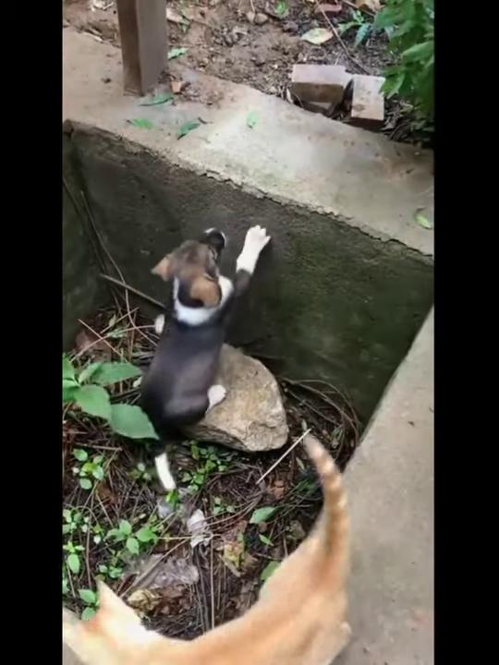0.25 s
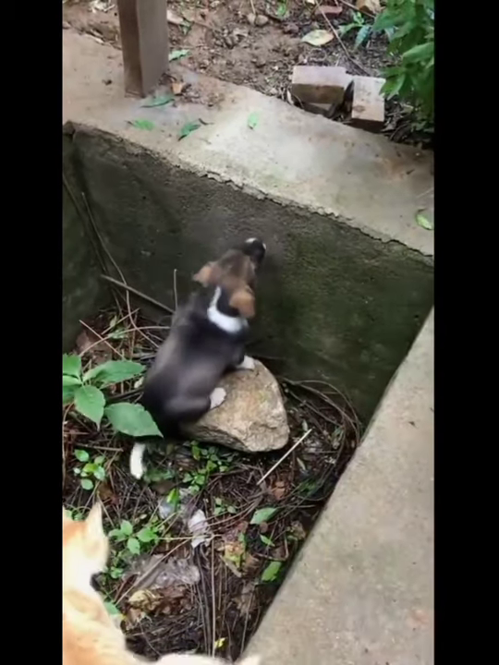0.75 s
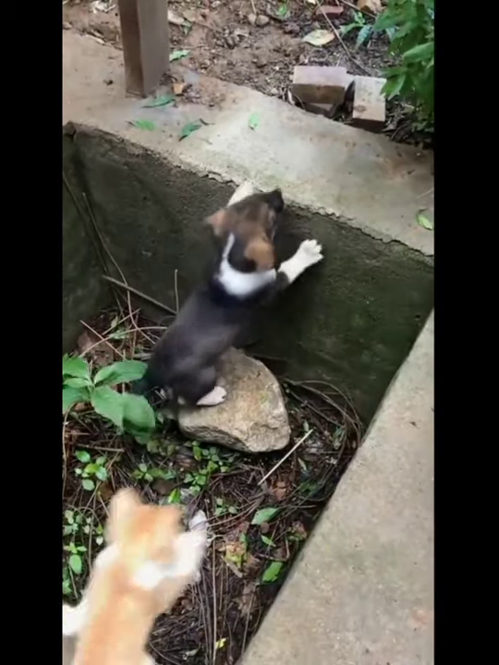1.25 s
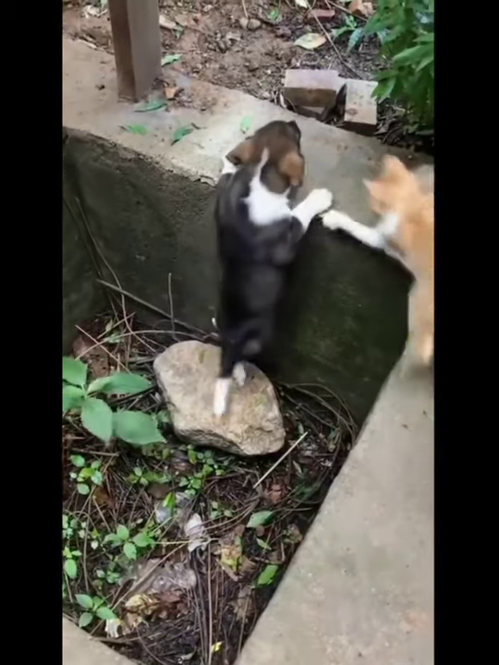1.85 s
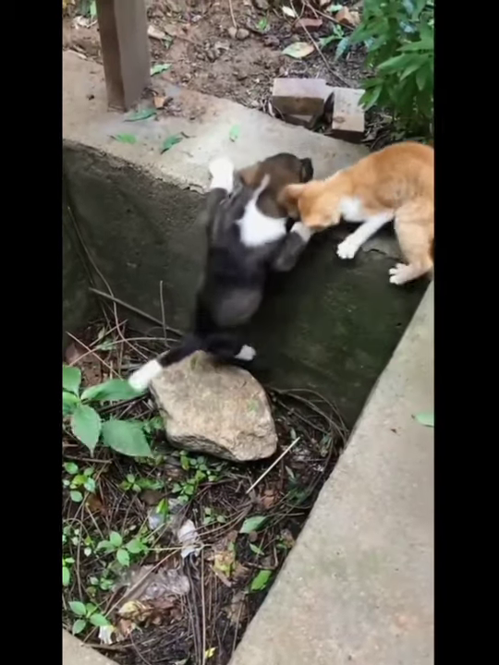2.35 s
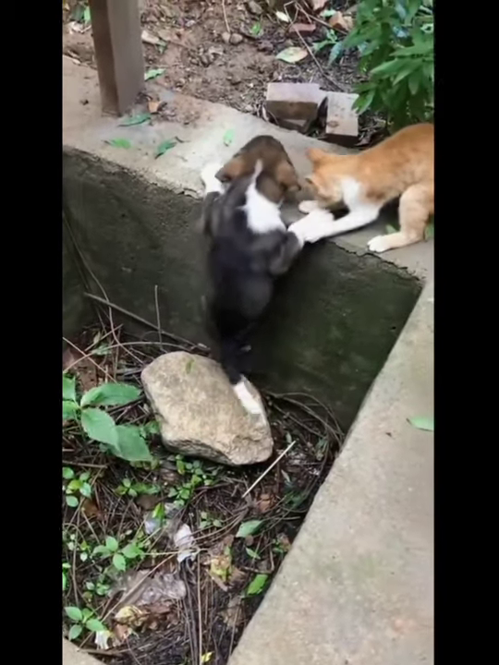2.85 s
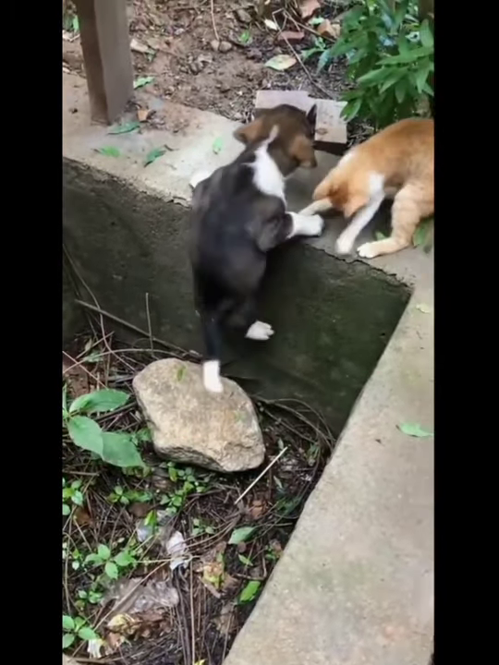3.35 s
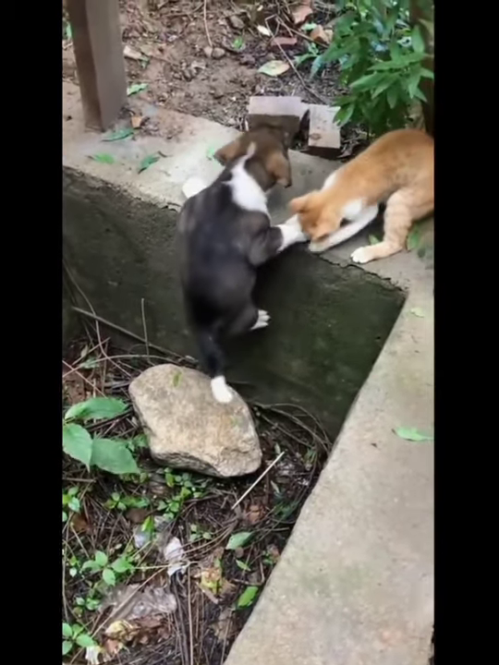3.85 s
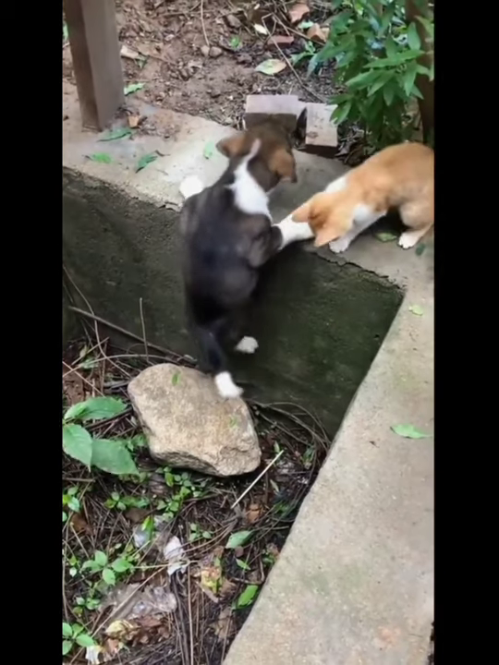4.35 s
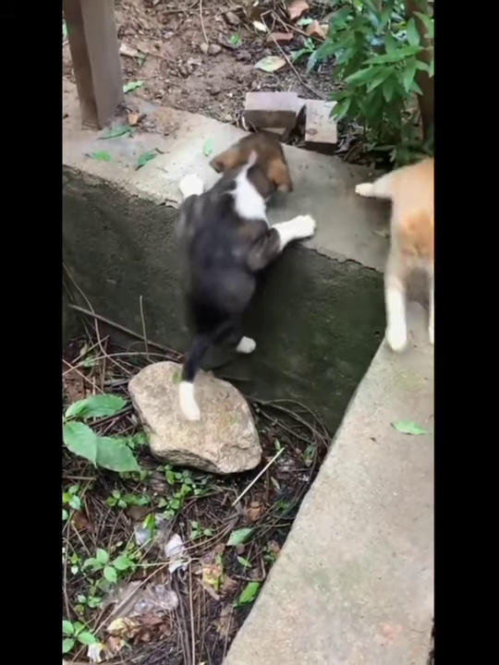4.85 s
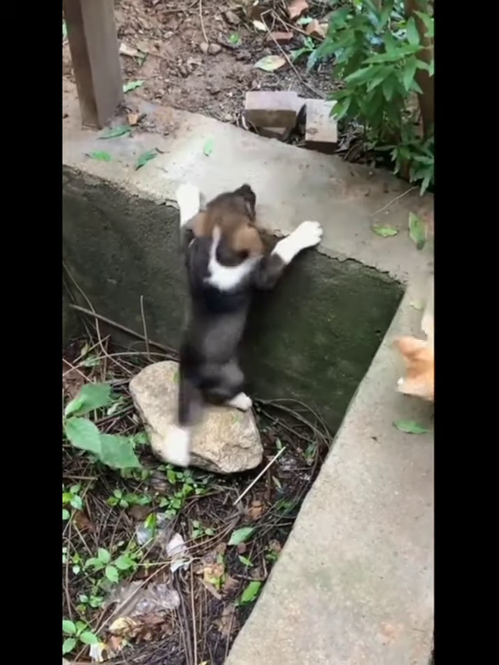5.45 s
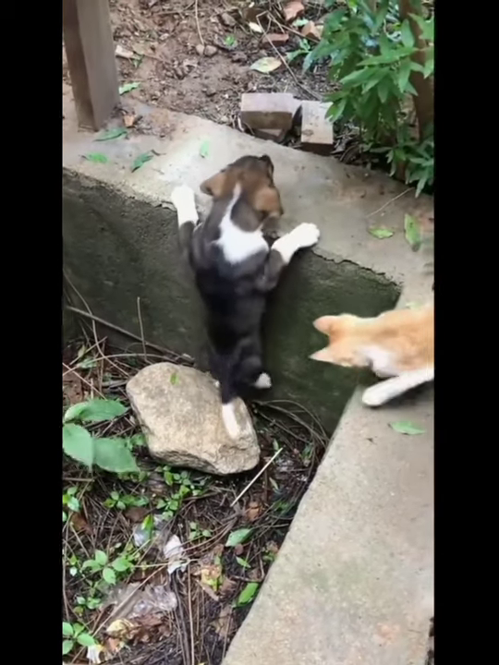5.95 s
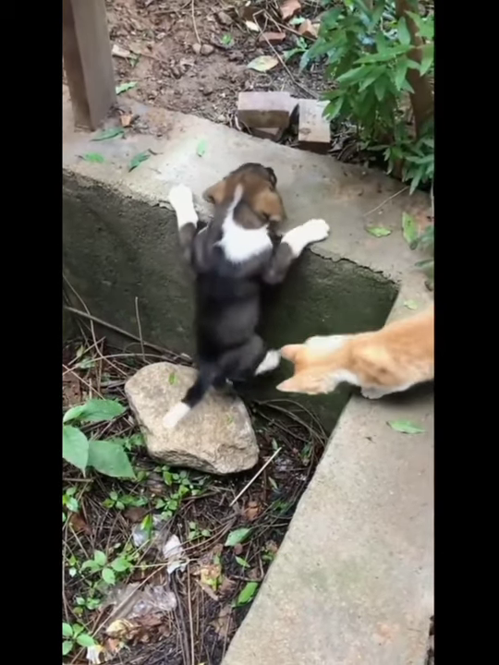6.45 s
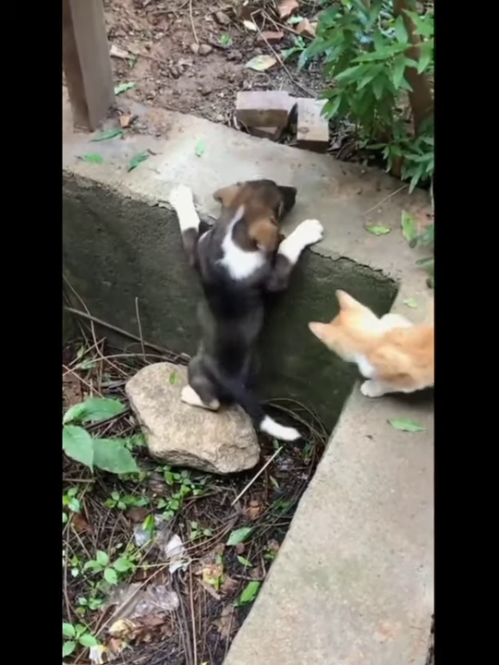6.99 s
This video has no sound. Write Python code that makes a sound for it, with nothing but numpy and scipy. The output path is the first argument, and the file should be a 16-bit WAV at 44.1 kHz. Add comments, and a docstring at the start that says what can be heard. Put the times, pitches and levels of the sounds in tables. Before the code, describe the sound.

A struggling puppy whimpers in quick gliding whistles, puffing and squeaking as its claws scratch rough concrete. A middle stretch holds mostly dry scrabbling bursts and soft fur rustle. After some harder scrapes, a wavering high whine rises, then small grunts and a closed-mouth moan, and finally a loud cracked yelp leaping into a piercing whine. Quiet outdoor air and low rumble sit behind, with only slight reflections from the walls.

```python
"""Puppy whining in a concrete pit

A puppy hangs on the concrete edge of a pit outdoors and whines in short, high, gliding cries.
Each cry is a nearly pure tone with thin overtones and hiss; the loudest starts with a lower, hoarse yelp.
Squeaks and grunts are narrow bands of noise, faint moans are wavering harmonics shaped by a closed mouth.
Claws scrape and catch as bursts of gritty noise; fur rustles; faint outdoor hiss and rumble lie behind."""
import sys
import numpy as np
from scipy import signal
from scipy.fft import rfft, irfft, next_fast_len
from scipy.io import wavfile

SR = 44100
rng = np.random.default_rng(int(sys.argv[2]) if len(sys.argv) > 2 else 0)


def store_pcm(level_fs):
    """Save levels as 16-bit WAV."""
    pcm = np.round(np.clip(level_fs, -1, 1) * 32767).astype(np.int16)
    wavfile.write(sys.argv[1], SR, np.atleast_2d(pcm).T)


N = 318402
TIME = np.arange(N) / SR
CUTOFF_HZ = 14000  # upper edge of the whole sound

# short cries; overtone and hiss levels are relative, ahead of the voice's own balance:
# start_s, length_s, start_pitch_hz, main_pitch_hz, end_pitch_hz, opening_tone_db, middle_tone_db,
# closing_tone_db, second_harmonic_db, third_harmonic_db, hiss_db, trailing_squeak_db
SHORT_CRIES = [(0.477, 0.049, 1090, 1347, 1326, -35, -26, -14.5, -40, -42, -42, -42),
               (0.606, 0.062, 1427, 1381, 1404, -24, -16, -20, -32, -39, -34, -37.5),
               (0.736, 0.038, 1442, 1440, 1400, -36, -23, -19.5, -38, -39.5, -31.5, -33),
               (1.148, 0.153, 1440, 1480, 1300, -30.5, -22.5, -24, -55, -46, -37.5, -47),
               (1.569, 0.079, 1075, 1338, 1360, -24.5, -18.5, -22.5, -44.5, -42.5, -40.5, -33),
               (1.708, 0.079, 1380, 1390, 1298, -33, -24.5, -24, -41.5, -48, -41, -33.5),
               (4.981, 0.028, 1170, 1163, 1150, -20, -29.5, -31, -60, -60, -45.5, -39),
               (6.46, 0.013, 1324, 1327, 1290, -26, -27.5, -34.5, -57, -53, -41, -39)]
# relative spectrum of claws on concrete: frequency_hz, density_db
CLAW_SPECTRUM = [(240, -44), (400, -15.5), (1030, -5.5), (1290, -9), (1430, -9.5), (3280, -5.5),
                 (3700, -7.5), (4970, -1), (6590, -6.5), (11400, -9), (13800, -14)]


def from_db(db):
    """Logarithmic level: decibels to amplitude gain."""
    return np.exp(np.asarray(db) * (np.log(10) / 20))


def rms_one(x):
    """Mean power: scale a signal to an rms of one."""
    return x / np.sqrt(np.mean(x ** 2) + 1e-20)


def at_hz(points, hz):
    """Spectral envelope: read levels in dB on a logarithmic frequency axis."""
    f, db = np.transpose(points)
    return np.interp(np.log(hz), np.log(f), db)


def in_time(rows):
    """Time envelope: join the rows of a curve by straight lines."""
    s, *columns = np.transpose(rows)
    return [np.interp(TIME, s, column) for column in columns]


def drift(rate_hz):
    """Low-passed chance: slow variation of unit rms, drawn at every eighth sample."""
    sos = signal.butter(2, min(8 * rate_hz, SR / 4), fs=SR, output="sos")
    settling = SR // 8
    slow = signal.sosfilt(sos, rng.standard_normal(N // 8 + settling))[settling:]
    return rms_one(np.interp(np.arange(N) / 8, np.arange(len(slow)), slow))


def coloured(x, spectrum, tilt_db=0):
    """Linear filtering: shape a noise by a spectrum, tilted in dB per octave, to unit power."""
    size = next_fast_len(len(x))
    hz = np.maximum(np.fft.rfftfreq(size, 1 / SR), 1)
    octaves = np.log2(np.maximum(hz, spectrum[0][0]) / SR)
    gain = from_db(at_hz(spectrum, hz) + tilt_db * octaves)
    return rms_one(irfft(rfft(x, size) * gain, size)[:len(x)])


def narrow_noise(hz, width_hz):
    """Quadrature modulation: low-passed noise becomes a narrow band whose centre follows hz."""
    sos = signal.butter(2, width_hz / 2, fs=SR, output="sos")
    a, b = signal.sosfilt(sos, rng.standard_normal((2, len(hz))))
    phase = 2 * np.pi * np.cumsum(hz) / SR
    return rms_one(a * np.cos(phase) + b * np.sin(phase))


def swell(length_s, skew):
    """Amplitude envelope: an arch from silence to one and back; a skew under one peaks early."""
    return np.abs(np.sin(np.pi * np.linspace(0, 1, int(length_s * SR)) ** skew))


def add(out, s, sound):
    """Superposition: mix a sound in at time s."""
    start = int(s * SR)
    out[start:start + len(sound)] += sound[:max(N - start, 0)]


def outdoor_hiss(level_db=-49.5):
    """Stationary noise: the steady outdoor background has a fixed spectrum and level."""
    # relative spectrum of the outdoors: frequency_hz, density_db
    outdoor_spectrum = [(15, -43), (25, -11), (107, -1), (172, -5.5), (249, -1.5), (645, -14), (698, -7),
                        (756, -11.5), (984, -21.5), (1500, -16), (1810, -24.5), (3590, -22), (4680, -27),
                        (7940, -9.5), (13800, -29)]
    return from_db(level_db) * coloured(rng.standard_normal(N), outdoor_spectrum)


def outdoor_rumble(centre_hz=215, width_hz=214):
    """Amplitude-modulated noise: a low band rises and falls in level."""
    # rumble level, joined by straight lines: time_s, level_db
    rumble_level = [(0, -47), (.6, -51.5), (1.1, -57.5), (1.85, -50.5), (2.5, -65), (4.4, -62.5),
                    (5.0, -48.5), (5.6, -56.5), (7.2, -56.5)]
    level_db, = in_time(rumble_level)
    return from_db(level_db) * narrow_noise(np.full(N, centre_hz), width_hz)


def pit(x, wet_db=-25, t60_s=0.3, first_echo_s=0.004):
    """Reverberation: the concrete walls return a short, weak, decaying scatter of echoes."""
    t = TIME[:SR // 2]
    echoes = rng.standard_normal(len(t)) * from_db(-60 * t / t60_s) * (t > first_echo_s)
    echoes = echoes / np.linalg.norm(echoes)
    return x + from_db(wet_db) * signal.fftconvolve(x, echoes)[:N]


def rustle(level_db=-58, tilt_db=-2, crackle_db=2.5, pressure_db=2.5):
    """Friction noise: fur and paws rub faintly on the wall, with a fine crackle."""
    pressure = pressure_db * drift(14)
    grains = rng.standard_normal(N) * from_db(crackle_db * drift(300))
    return from_db(level_db + pressure) * coloured(grains, CLAW_SPECTRUM, tilt_db)


def claws(grit_db=3.2, skew=0.59, tick_t60_s=0.048, tick_db=-5, patchy_db=3):
    """Friction and impact: claws skip over concrete grains; a catch is a sharp, decaying burst."""
    # claws dragged on concrete: start_s, length_s, level_db
    scrapes = [(0.173, 0.12, -41), (0.28, 0.19, -42.5), (0.779, 0.13, -40.5), (1.398, 0.046, -44),
               (1.521, 0.089, -43.5), (1.79, 0.15, -46), (1.976, 0.079, -39), (2.056, 0.1, -40.5),
               (2.263, 0.03, -42.5), (2.347, 0.07, -38), (2.525, 0.078, -42), (2.599, 0.14, -45.5),
               (2.869, 0.078, -41.5), (3.318, 0.13, -46.5), (3.415, 0.05, -37.5), (3.485, 0.053, -38),
               (3.78, 0.036, -40), (3.885, 0.04, -45), (3.988, 0.057, -33), (4.22, 0.018, -42.5),
               (4.327, 0.063, -31.5), (4.433, 0.044, -32.5), (4.638, 0.17, -49), (4.818, 0.1, -47.5),
               (4.963, 0.16, -46.5), (5.228, 0.027, -43.5), (5.426, 0.085, -36.5), (5.51, 0.062, -37.5),
               (5.556, 0.048, -31), (6.515, 0.125, -36.5), (6.656, 0.035, -40.5), (6.775, 0.034, -38.5)]
    # claws catching on the wall, ahead of tick_db: start_s, relative_level_db
    catches = [(2.0668, -22.5), (2.362, -22), (2.4912, -27), (2.5343, -24), (2.6514, -24), (3.415, -32),
               (3.491, -24), (3.6215, -30), (3.7773, -31.5), (3.8763, -33), (4.6967, -30.5), (4.8324, -36),
               (4.973, -28.5), (6.891, -30)]
    # a harder scrape is brighter: level with the plain colour; dB per octave for each dB above
    plain_scrape_db, brightening = -39, 0.27
    out = np.zeros(N)
    grit = rng.standard_normal(N) * from_db(grit_db * np.clip(drift(700), -2, 2))
    contact_hz = np.geomspace(250, CUTOFF_HZ, 20)
    # every scrape has a colour of its own
    patches_db = patchy_db * rng.standard_normal((len(scrapes), len(contact_hz)))
    colours = at_hz(CLAW_SPECTRUM, contact_hz) + patches_db
    for (s, length, db), colour in zip(scrapes, colours):
        bright_db = brightening * (db - plain_scrape_db)
        shape = swell(length, skew)
        grains = grit[int(s * SR):][:len(shape)]
        rub = coloured(grains, np.column_stack([contact_hz, colour]), bright_db)
        add(out, s, from_db(db) * shape * rub)
    t = TIME[:SR // 10]
    for s, db in catches:
        decay = from_db(db + tick_db - 60 * t / tick_t60_s)
        add(out, s, decay * coloured(rng.standard_normal(len(t)), CLAW_SPECTRUM))
    return out


def grunts(width_hz=380, skew=0.64):
    """Resonant turbulence: the straining puppy's effort gives short dull puffs of noise."""
    # grunts of effort: start_s, length_s, resonance_hz, level_db
    efforts = [(0.549, 0.039, 532, -34.5), (0.685, 0.027, 497, -37.5), (0.787, 0.037, 537, -34),
               (1.797, 0.1, 480, -38.5), (1.982, 0.026, 477, -41.5), (2.184, 0.03, 600, -45.5),
               (2.333, 0.017, 860, -36.5), (5.024, 0.16, 949, -47), (5.886, 0.064, 848, -43.5),
               (6.102, 0.083, 903, -45.5), (6.479, 0.07, 846, -43.5)]
    out = np.zeros(N)
    for s, length, hz, db in efforts:
        shape = swell(length, skew)
        add(out, s, from_db(db) * shape * narrow_noise(np.full(len(shape), hz), width_hz))
    return out


def squeaks(width_hz=900, skew=0.71, fall_hz_per_s=5000):
    """Jet whistle: air forced through a tight gap sings unsteadily, falling as the pressure drops."""
    # other squeaks, many of them opening or ending a cry: start_s, length_s, middle_pitch_hz, level_db
    others = [(0.208, 0.05, 9580, -35.5), (0.467, 0.099, 10330, -35.5), (0.742, 0.03, 9600, -29.5),
              (1.022, 0.036, 9680, -34), (1.063, 0.12, 7970, -38.5), (1.15, 0.13, 6920, -33.5),
              (1.759, 0.077, 8000, -37), (4.638, 0.062, 9200, -41.5), (4.661, 0.091, 8250, -35.5),
              (5.873, 0.065, 9020, -34.5), (6.446, 0.079, 10100, -36)]
    # as a short cry closes, the last air escapes in a squeak
    delay_s, trail_s, trail_hz = 0.0018, 0.07, 8250
    trailing = [(s + length + delay_s, trail_s, trail_hz, db) for s, length, *_, db in SHORT_CRIES]
    out = np.zeros(N)
    for s, length, hz, db in others + trailing:
        shape = swell(length, skew)
        pitch = hz - fall_hz_per_s * (TIME[:len(shape)] - length / 2)
        add(out, s, from_db(db) * shape * narrow_noise(pitch, width_hz))
    return out


def throat(calls, shape, glide_power, jitter, rasp, waver_db, fade):
    """Source and filter: gliding, wavering harmonics of the lower voice are shaped by the throat."""
    out = np.zeros(N)
    wobble, grain, waver = drift(250), drift(700), drift(25)
    for s, length, start_hz, end_hz, start_db, end_db in calls:
        span = slice(int(s * SR), int((s + length) * SR))
        along = np.linspace(0, 1, len(TIME[span]))
        glide = start_hz + (end_hz - start_hz) * along ** glide_power
        pitch = glide * (1 + jitter * wobble[span])
        phase = 2 * np.pi * np.cumsum(pitch) / SR
        stack = 0
        for k in range(1, 10):
            # each harmonic reads the waver half a second apart from its neighbour
            own_waver = np.roll(waver, k * SR // 2)[span]
            gain = from_db(at_hz(shape, k * pitch) + waver_db * own_waver)
            stack = stack + gain * np.sin(k * phase + rng.uniform(0, 2 * np.pi))
        level = from_db(start_db + (end_db - start_db) * along)
        level = level * signal.windows.tukey(len(pitch), fade)
        add(out, s, rms_one(stack * (1 + rasp * grain[span])) * level)
    return out


def moans():
    """Closed-tract resonance: the closed mouth muffles faint gliding moans."""
    # faint moans: start_s, length_s, start_pitch_hz, end_pitch_hz, start_level_db, end_level_db
    calls = [(1.35, 0.22, 640, 612, -54, -51), (3.23, 0.34, 669, 639, -50.5, -51),
             (5.9, 0.27, 610, 684, -46.5, -51)]
    # relative response of the closed mouth: frequency_hz, level_db
    closed_mouth = [(650, -13.5), (1280, -0.5), (1950, -7.5), (2600, -15), (3250, -13), (3900, -5),
                    (4600, -15), (6000, -30)]
    return throat(calls, closed_mouth, glide_power=1.1, jitter=0.021, rasp=0.4, waver_db=4.5, fade=0.3)


def yelp():
    """Register leap: the hoarse voice opening the loudest cry swells and leaps towards the whine."""
    # relative response of the throat: frequency_hz, level_db
    open_throat = [(600, -16), (900, -3.5), (1300, 6), (1800, -1.5), (2500, -5), (3500, 0.5), (4300, -13),
                   (5500, -21), (7000, -35), (13000, -32)]
    # start_s, length_s, start_pitch_hz, end_pitch_hz, start_level_db, end_level_db
    leap = (6.908, 0.046, 825.5, 1090, -21.5, -14.5)
    return throat([leap], open_throat, glide_power=2.6, jitter=0.031, rasp=0.3, waver_db=4, fade=0.12)


def short_cry(t, length, start_hz, main_hz, end_hz, opening_db, middle_db, closing_db,
              second_db, third_db, air_db):
    """Frequency glide: pitch slides quickly from its start to the main pitch, then bends ever faster."""
    slide_s, bend_power = 0.024, 1.5
    overtones_follow = 0.52  # share of the tone's change in dB that its overtones follow
    along = np.clip(t / length, 0, 1)
    slide = (start_hz - main_hz) * np.exp(-(t / slide_s) ** 2)
    bend = (end_hz - main_hz) * along ** bend_power
    tone_db = np.interp(along, [0, .5, 1], [opening_db, middle_db, closing_db])
    change_db = overtones_follow * (tone_db - middle_db)
    return main_hz + slide + bend, tone_db, second_db + change_db, third_db + change_db, air_db


def wail(t, curve, hiss_db=-35, hiss_follows=0.1):
    """Unsteady phonation: pitch and levels of a strained cry wander, and hiss grows with the tone."""
    s, *columns = np.transpose(curve)
    pitch, tone_db, second_db, third_db = [np.interp(t, s - s[0], column) for column in columns]
    return pitch, tone_db, second_db, third_db, hiss_db + hiss_follows * tone_db


def crying():
    """Onset and decay: every cry opens quickly and dies away; overtones and air outlast the tone."""
    # three strained cries whose pitch breaks and wanders, one curve each; overtones are relative:
    # time_s, pitch_hz, tone_db, second_harmonic_db, third_harmonic_db
    wails = [
        [(1.026, 1067, -28, -55, -55), (1.032, 1071, -28, -48, -50), (1.046, 1003, -16, -35, -41),
         (1.058, 1200, -17, -29.5, -36), (1.07, 1356, -19.5, -31, -33), (1.095, 1361, -25.5, -35.5, -44)],
        [(5.562, 1283, -33, -42, -37), (5.574, 1295, -20.5, -45, -38), (5.588, 1106, -12, -37, -27),
         (5.598, 1103, -8, -32, -31), (5.61, 1298, -19.5, -36, -38), (5.624, 1387, -20.5, -35, -38),
         (5.646, 1403, -22.5, -40, -33.5), (5.71, 1355, -20, -36, -39.5), (5.724, 1398, -19.5, -40, -38),
         (5.772, 1341, -17.5, -36.5, -32.5), (5.848, 1251, -12.5, -34.5, -42), (5.866, 1139, -15, -37, -35),
         (5.89, 1149, -24, -41, -45)],
        [(6.941, 1010, -21, -24, -25), (6.949, 1183, -11.5, -25, -29), (6.955, 1264, -6, -22.5, -23),
         (6.981, 1360, -8.5, -39, -34.5), (7.005, 1352, -12.5, -44, -40), (7.027, 1460, -11, -47, -44),
         (7.043, 1482, -10.5, -39, -41), (7.057, 1492, -12.5, -42, -44), (7.091, 1390, -6.5, -32, -28.5),
         (7.099, 1383, -9, -32, -38), (7.133, 1397, -4.5, -41.5, -23.5), (7.191, 1402, -5, -36, -26.5),
         (7.215, 1282, -9.5, -25, -38)],
    ]
    attack_s, release_db_per_s, air_release_db_per_s = 0.0072, 1100, 479
    t = TIME[:SR // 2]
    cries = [(s, length, short_cry(t, length, *shape)) for s, length, *shape, _ in SHORT_CRIES]
    for curve in wails:
        start_s, end_s = curve[0][0], curve[-1][0]
        cries.append((start_s, end_s - start_s, wail(t, curve)))
    # rows: pitch in Hz, then tone, second harmonic, third harmonic and hiss in dB
    controls = np.full((5, N), -120.)
    controls[0] = SHORT_CRIES[0][2]
    attack_db = 20 * np.log10(np.clip(t / attack_s, 1e-6, 1))
    for s, length, (pitch, tone_db, *upper_db) in sorted(cries, key=lambda cry: cry[0]):
        after, start = np.maximum(t - length, 0), int(s * SR)
        voice_db = attack_db - release_db_per_s * after
        rush_db = attack_db - air_release_db_per_s * after
        cry = np.array([pitch, tone_db + voice_db] + [db + rush_db for db in upper_db])
        controls[:, start:start + len(t)] = cry[:, :N - start]
    return controls


def whine(steady_hz=1380, slack_hz=250, jitter=0.0025, slack_jitter=0.009, shimmer_db=1.24,
          slack_db=1.1, flutter_db=3.5, lower_db=7, upper_db=2, halo=0.3, slack_halo=0.4,
          halo_half_width_hz=330, crack_s=0.0027, hoarse_db=-6, hiss_db=-5.0):
    """Fold tension: a whistle-like voice is clean when taut and high, unsteady and hoarse when slack."""
    # instants at which the voice cracks: time_s
    cracks = [1.034, 1.582, 4.996, 5.605, 5.812, 5.864, 6.977, 7.03]
    # relative strength of the overtones: harmonic_number, level_db
    overtones = [(2, -2), (3, -1.5), (4, -3), (5, -2.5), (6, -5.5), (7, -5), (8, -7.5), (9, -7.5),
                 (10, -10)]
    # relative response of the muzzle: frequency_hz, level_db
    muzzle = [(1500, -8.5), (2700, -3.5), (3400, -17), (4200, -3), (5500, -8), (7000, -4.5), (8300, -9.5),
              (9800, -0.5), (12500, -7), (14000, -12)]
    # relative spectrum of the escaping air: frequency_hz, density_db
    air_spectrum = [(700, -10), (1200, -6), (1900, -22.5), (3300, -25), (4800, -13.5), (6500, -1),
                    (7600, -29), (9800, -7.5), (11500, 2), (13000, -24), (14000, -33)]
    pitch, tone_db, second_db, third_db, air_db = crying()
    slack = np.clip((steady_hz - pitch) / slack_hz, 0, 1)
    unsteady = 1 + (jitter + slack_jitter * slack) * drift(192)
    phase = 2 * np.pi * np.cumsum(pitch * unsteady) / SR

    # each crack briefly dips the fundamental
    dips = 1 - 0.65 * sum(np.exp(-((TIME - s) / crack_s) ** 2) for s in cracks)
    shimmer = (shimmer_db + slack_db * slack) * drift(58)
    voice = dips * from_db(tone_db + shimmer) * np.sqrt(2) * np.sin(phase)

    for k, db in overtones:
        # the top overtones grow with the rush of air; noise frays every overtone into a narrow halo
        airy = np.clip((k - 3) / 3, 0, 1)
        overtone_db = second_db if round(k) == 2 else third_db
        level = (1 - airy) * (overtone_db + lower_db) + airy * (air_db + upper_db)
        level = level + db + at_hz(muzzle, k * pitch) + flutter_db * drift(57)
        fray = (halo + slack_halo * slack) * k / 5
        wave = np.sin(round(k) * phase) + fray * narrow_noise(round(k) * pitch, 2 * halo_half_width_hz)
        voice += from_db(level) * wave / np.sqrt(1 + fray ** 2)

    # slack folds alternate strong and weak cycles: broken partials halfway between the overtones
    halves = sum(np.sin(k * phase / 2) for k in range(5, 12, 2))
    voice += slack * from_db(second_db + hoarse_db) * drift(120) * halves
    # air escapes in puffs, one per cycle
    puffs = 1 + 0.62 * np.sin(phase)
    hiss = coloured(rng.standard_normal(N), air_spectrum) * puffs
    return voice + hiss * from_db(air_db + hiss_db)


def scene():
    """Superposition: the puppy's sounds echo in the pit, over the outdoor hiss and rumble."""
    background = outdoor_hiss() + outdoor_rumble()
    contact = rustle() + claws()
    puppy = grunts() + squeaks() + moans() + yelp() + whine()
    return (pit(contact + puppy) + background)[None]


def record(dry, ceiling=0.69):
    """Saturation and band limit: loud peaks flatten at the ceiling; the top is cut steeply."""
    rounded = dry / (1 + (dry / ceiling) ** 8) ** (1 / 8)
    low_pass = signal.ellip(12, .1, 90, CUTOFF_HZ, fs=SR, output="sos")
    return signal.sosfilt(low_pass, rounded)


dry = scene()
out = record(dry)
store_pcm(out)
```